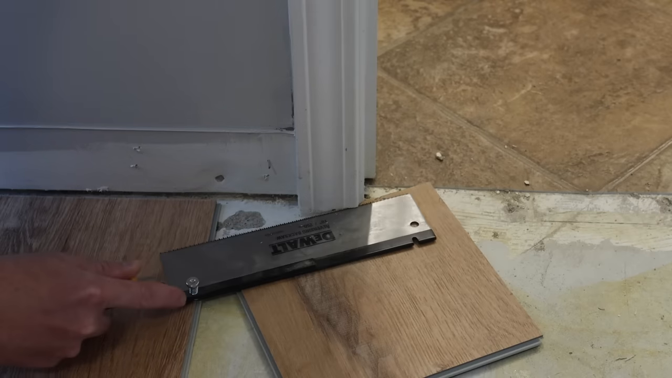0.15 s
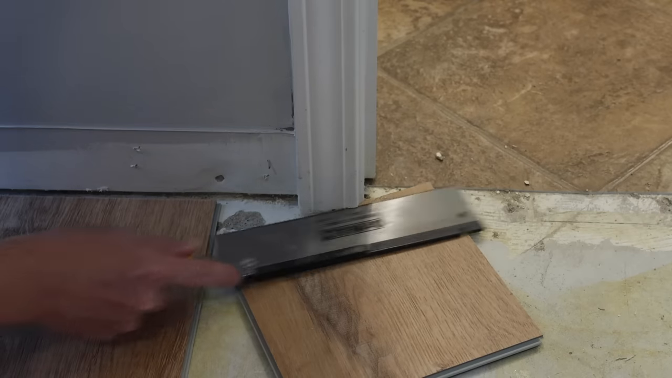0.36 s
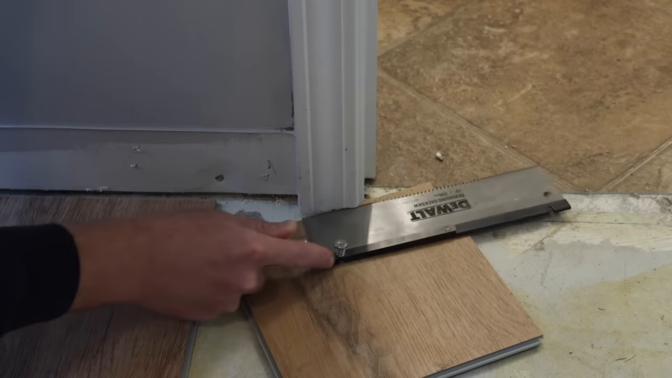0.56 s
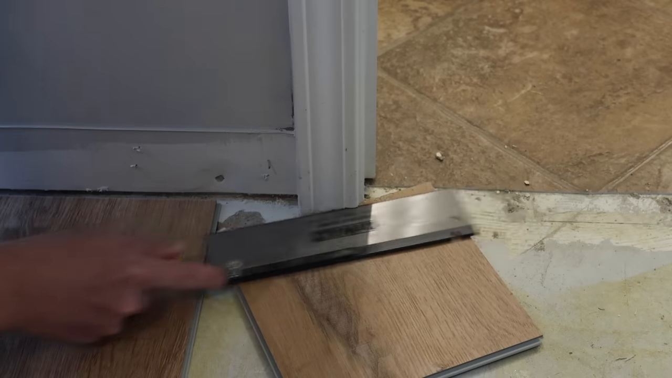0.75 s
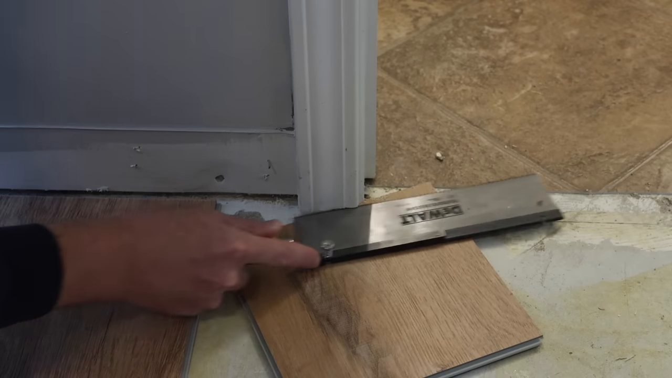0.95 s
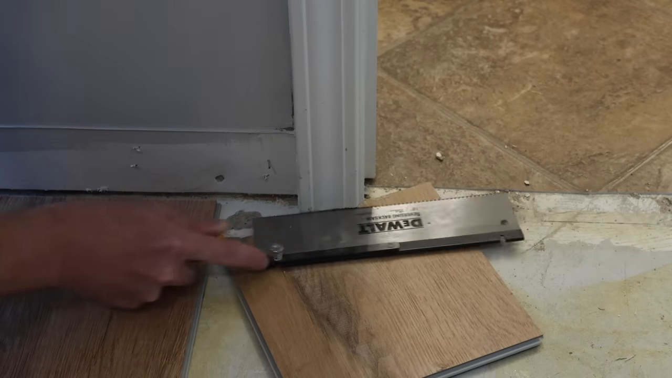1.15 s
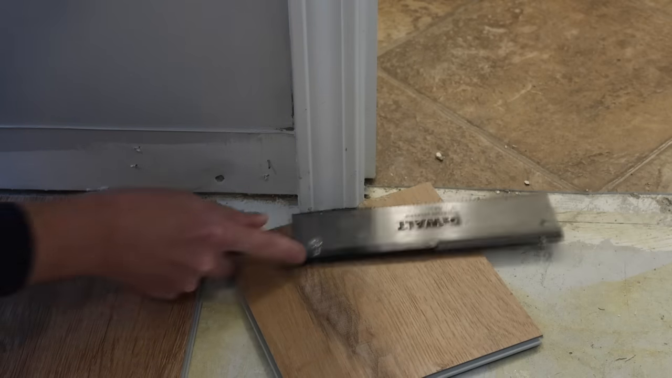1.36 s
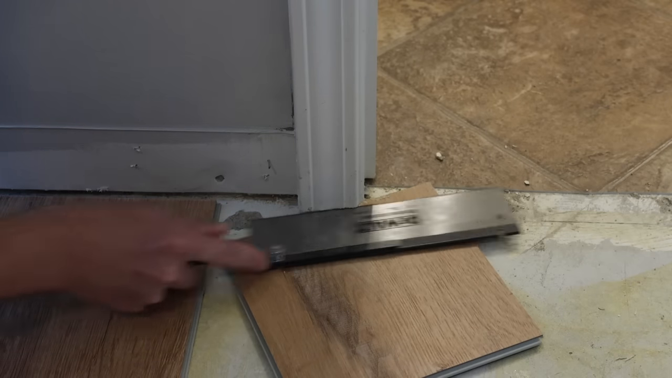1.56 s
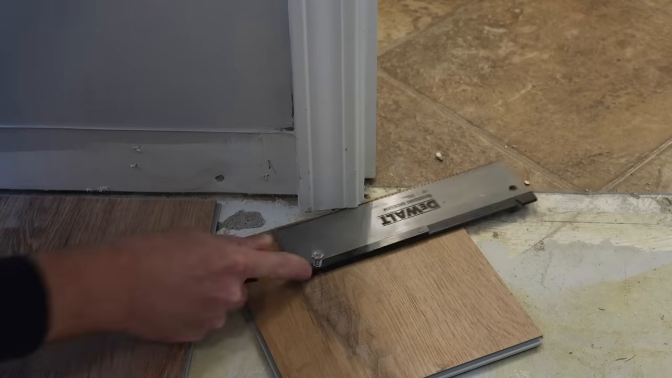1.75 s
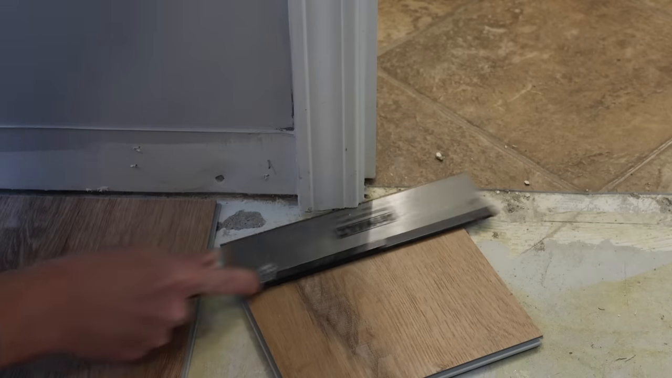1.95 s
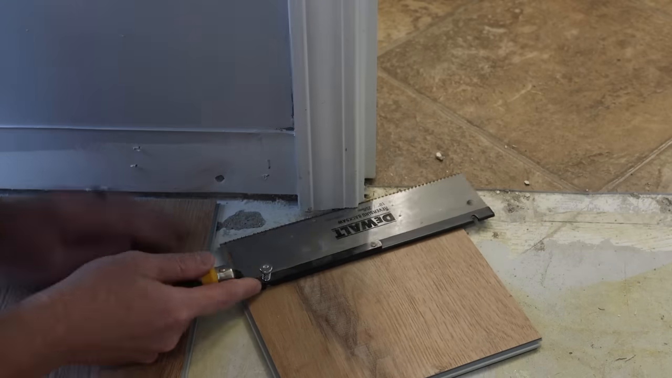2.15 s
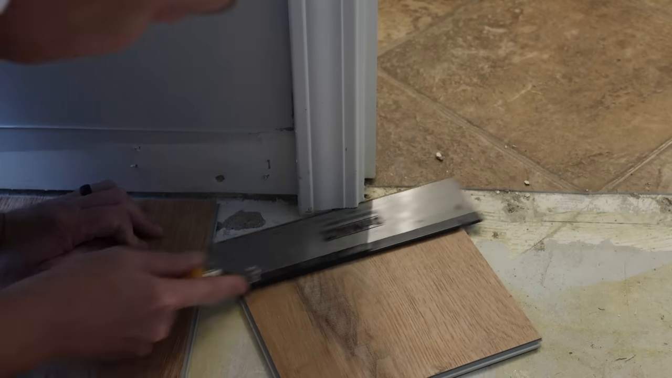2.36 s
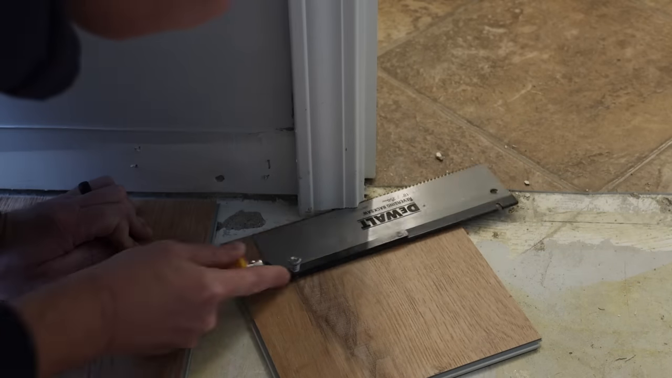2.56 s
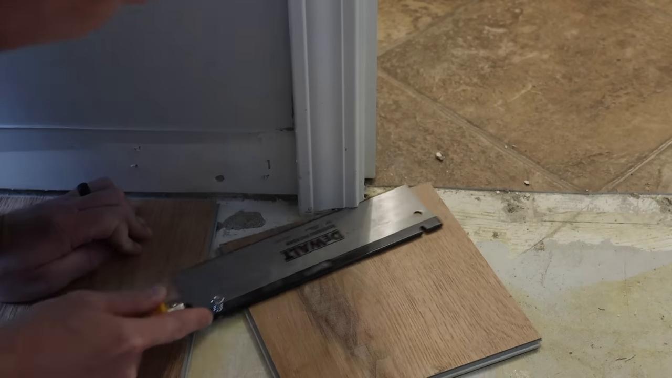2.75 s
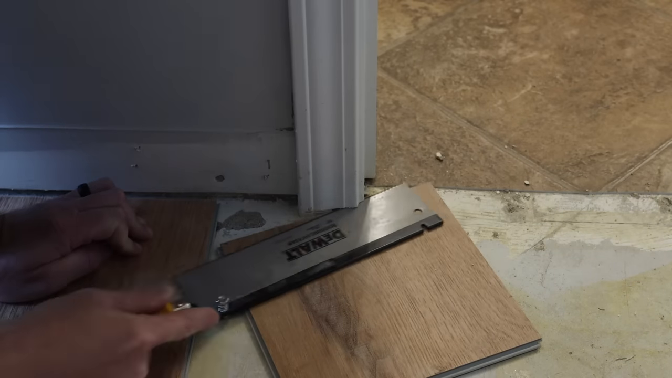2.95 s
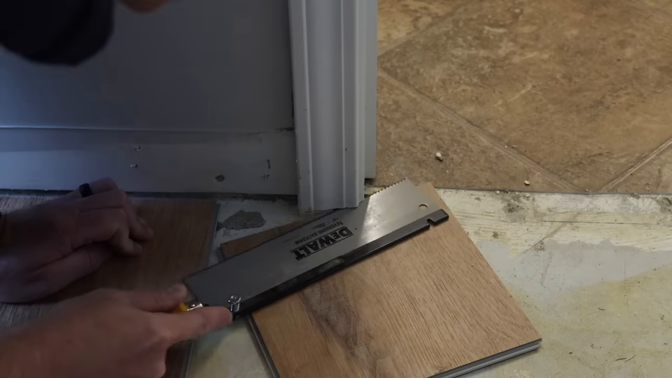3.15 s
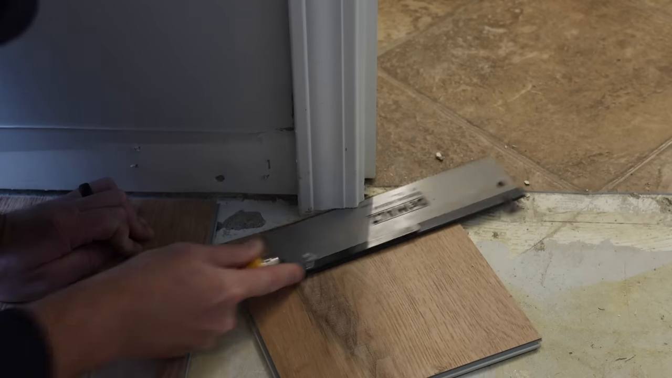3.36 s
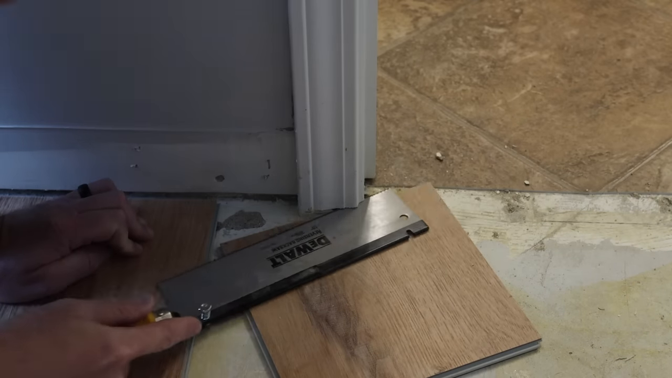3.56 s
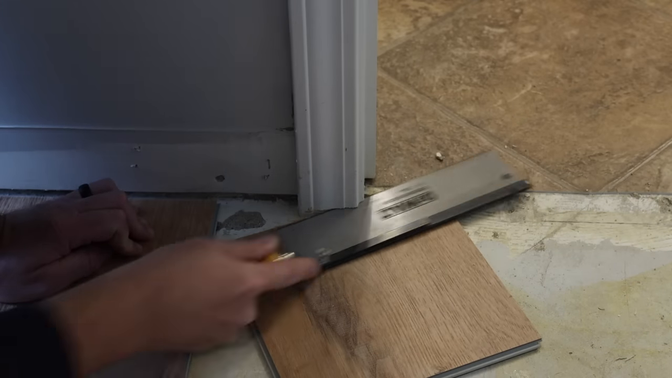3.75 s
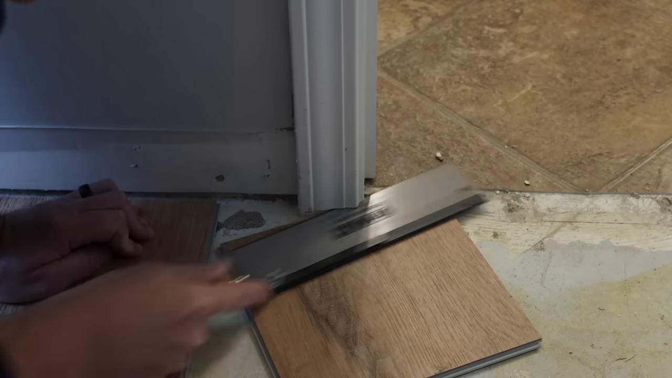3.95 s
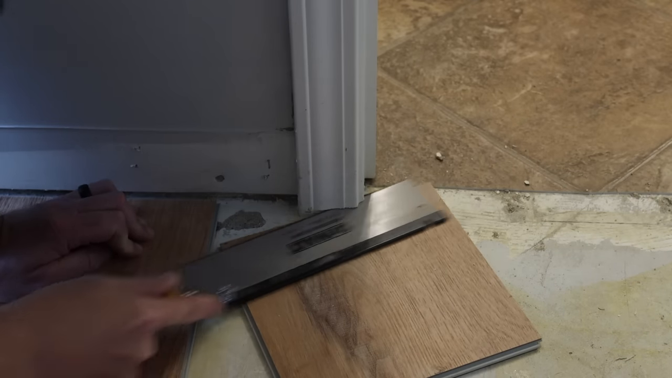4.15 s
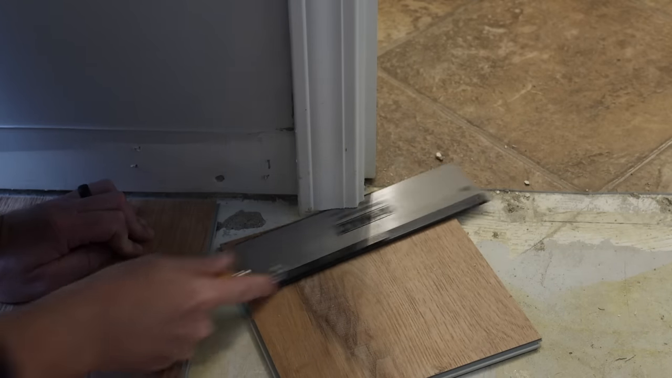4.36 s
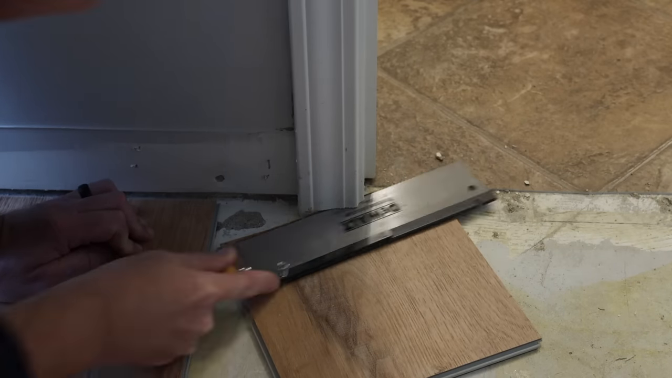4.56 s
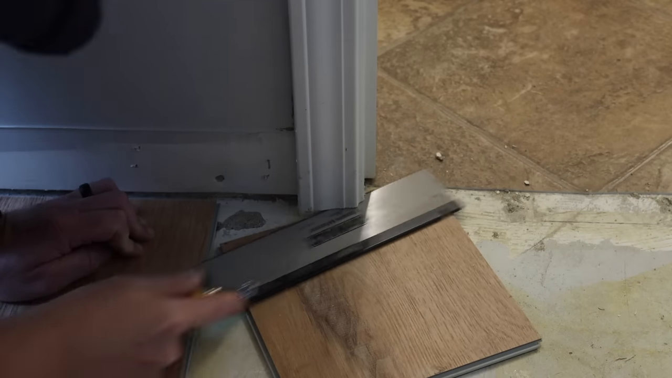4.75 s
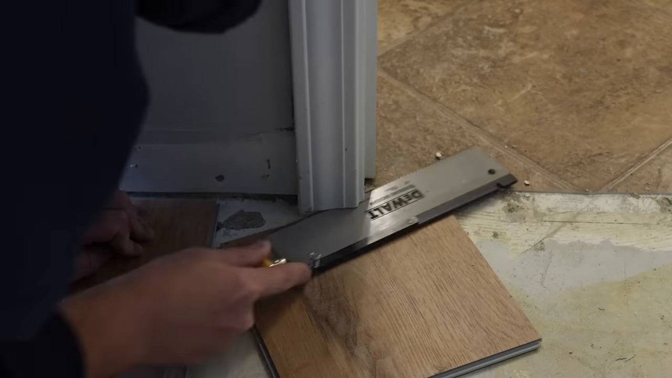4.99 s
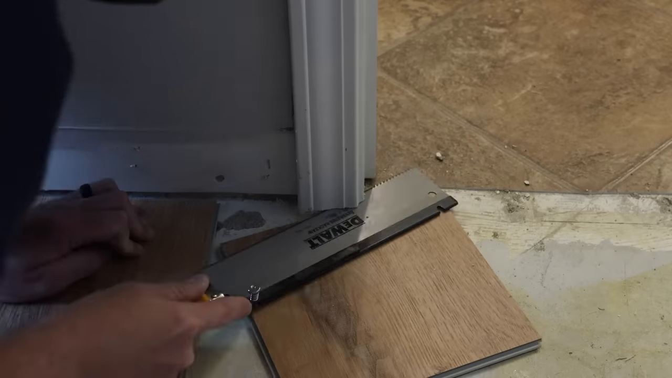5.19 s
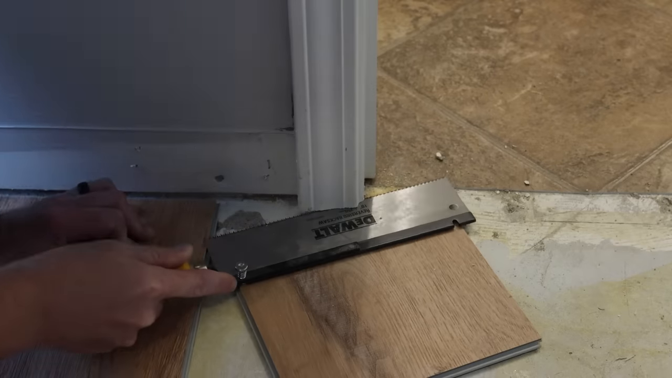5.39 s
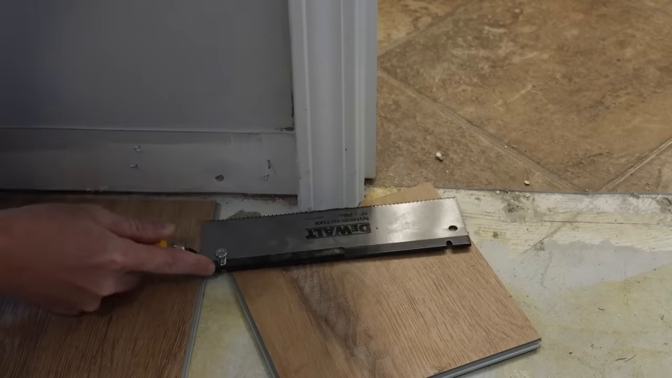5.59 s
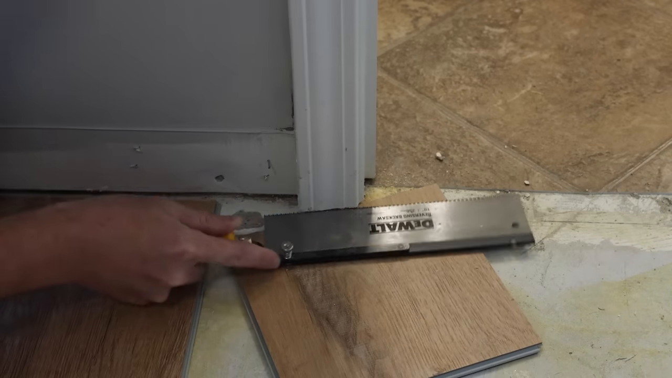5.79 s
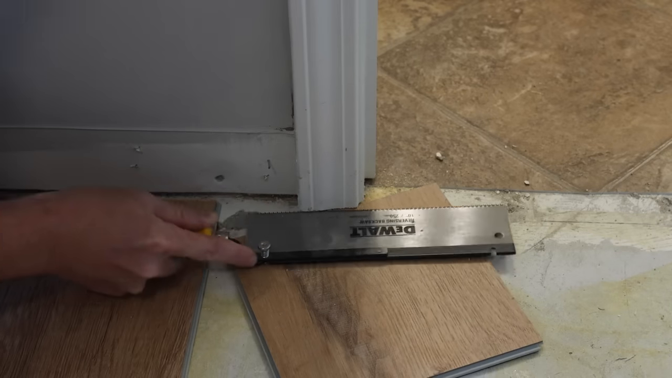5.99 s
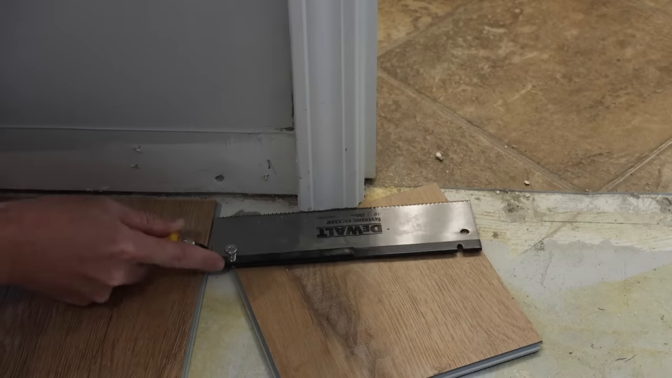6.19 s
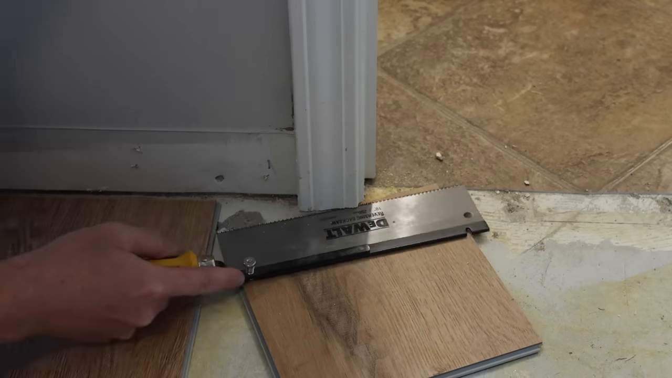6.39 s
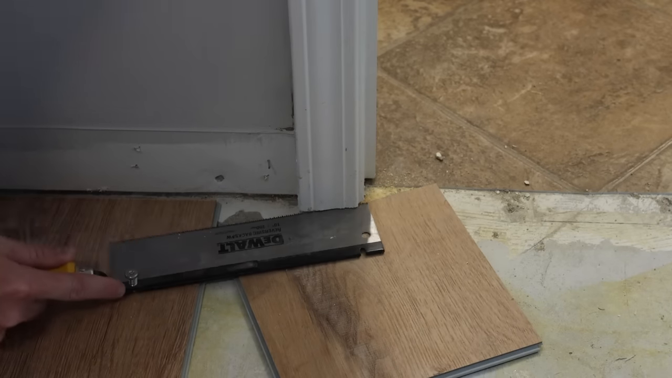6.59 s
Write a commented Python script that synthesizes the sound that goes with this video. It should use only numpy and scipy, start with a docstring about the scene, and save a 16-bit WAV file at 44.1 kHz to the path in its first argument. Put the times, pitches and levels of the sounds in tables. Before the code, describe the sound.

Close in a small bare room, a fine-toothed hand saw scrapes wood in three slow, rough strokes with sharp ticks and hard knocks. The sound cuts off abruptly and quickly resumes as rapid short rasps, first light, then in fuller groups with small pauses. A long steady run of hurried sawing follows, woody and buzzing, then stops, leaving faint scrapes and soft nudges over very low hiss.

```python
"""A flush-cut hand saw on a floor board undercuts painted door trim in a bare room.
First come three slow strokes with ticking teeth and knocks on the wood; then all sound cuts out at once.
It fades back in as rapid short stroke sounds in groups, with pauses, soft thumps and a few last nudges.
Teeth rasp (bright random grit in bands), catch (short low chatter tones) and shake board and trim
(grit through resonances); the blade rings, a short room tail follows and a faint hiss lies below."""
import sys
import numpy as np
from scipy import signal
from scipy.io import wavfile
from scipy.ndimage import uniform_filter1d

SR = 44100
rng = np.random.default_rng(int(sys.argv[2]) if len(sys.argv) > 2 else 0)


def dump(signal):
    """Clip the signal to [-1, 1] and save it as 16-bit WAV at the path in sys.argv[1]."""
    limited = np.clip(np.atleast_2d(signal).T, -1, 1)
    pcm = np.round(limited * 32767).astype(np.int16)
    wavfile.write(sys.argv[1], SR, pcm)


N = 292383

# Rasp and hiss levels in these tables are drive levels: GRIT_DB and HISS_LIFT_DB are added later.
# The slow strokes, joined by straight lines:
# time_s, trim_db, board_db, rasp_db, hiss_above_rasp_db
SLOW_STROKES = [(0.0, -27, -40, -28, -12), (0.022, -32.5, -35, -36, -2), (0.13, -23.5, -43, -29.5, -2),
                (0.182, -32.5, -34.5, -36, -8), (0.31, -41, -50, -46, -8.5),
                (0.382, -39, -40.5, -45.5, 4.5), (0.442, -32, -35.5, -36, 6.5),
                (0.478, -35.5, -35, -42, 10), (0.532, -29.5, -33.5, -35, -2.5),
                (0.59, -36, -42, -42.5, 0.5), (0.646, -48, -38.5, -43, -14.5),
                (0.676, -44.5, -43.5, -45, -3.5), (0.79, -28, -38.5, -38.5, 1.5),
                (0.824, -20.5, -40, -26.5, -1), (0.904, -33.5, -36, -33, -9), (0.957, -28, -38, -39, -6.5)]
# Each rapid stroke sound: peak_s, length_ms (shares of it give rise and fall), rasp_db,
# hiss_above_rasp_db
RAPID_STROKES = [(1.005, 16, -42.5, 3.5), (1.061, 10, -33, -8.5), (1.124, 9.3, -41.5, 4.5),
                 (1.186, 7.4, -31.5, -7), (1.286, 4.6, -40, -15), (1.321, 13, -42, -6),
                 (1.392, 14.5, -44.5, 8), (1.444, 19, -32.5, -12.5), (1.508, 10, -43, 5.5),
                 (1.556, 13, -32.5, -10), (1.627, 10, -42.5, 3), (1.689, 8, -35, -1.5),
                 (1.755, 8.8, -55, -2), (1.807, 8.8, -38, -2), (1.85, 13.4, -35, -5.5),
                 (1.895, 11, -38.5, -0.5), (1.944, 13, -35.5, -7), (1.984, 11, -37.5, -2.5),
                 (2.027, 9.3, -35.5, -3), (2.067, 9.4, -44, 1), (2.224, 9.6, -45, 0), (2.325, 9, -34.5, -2),
                 (2.364, 9.3, -42.5, 2), (2.414, 9.5, -37.5, -1), (2.454, 12, -40.5, -1),
                 (2.509, 12, -34, -0.5), (2.551, 10, -40, 0.5), (2.604, 13.3, -31.5, -3.5),
                 (2.642, 11, -31.5, -3), (2.819, 8, -49.5, -7), (2.873, 12.1, -28.5, -3),
                 (2.915, 8.4, -32.5, -3), (2.956, 11.5, -30, -2.5), (3.0, 10, -32, -1.5),
                 (3.039, 9.6, -32, -1), (3.077, 8.7, -32, -4), (3.123, 9.5, -32.5, -2), (3.161, 9, -35, -3),
                 (3.313, 11.4, -36.5, -1.5), (3.355, 10.3, -37, 0), (3.399, 10.5, -30, -1.5),
                 (3.439, 9.7, -29, -7), (3.532, 11, -54, 0), (3.659, 12, -30.5, -3), (3.693, 8, -34, -2),
                 (3.734, 10.6, -30, -5), (3.768, 10, -30, -7), (3.814, 10.8, -28, -3),
                 (3.852, 10.5, -31.5, -4.5), (3.89, 9.8, -29, -4), (3.933, 9.7, -28, -4),
                 (3.981, 10.5, -30, -3), (4.02, 10, -31.5, -6), (4.066, 9.6, -29, -4.5),
                 (4.1, 11, -31.5, -5), (4.149, 7.8, -34, 0), (4.186, 7.9, -34.5, -5.5),
                 (4.229, 8.6, -34.5, -0.5), (4.271, 8.8, -36.5, -2.5), (4.323, 11, -34, -4),
                 (4.376, 7.3, -36, -6), (4.418, 8.4, -31.5, -5.5), (4.455, 9.3, -33.5, -6.5),
                 (4.512, 11, -36, -2), (4.569, 10, -37, -6.5), (4.61, 8.1, -33.5, -1.5),
                 (4.648, 8.6, -33.5, -6), (4.699, 7.7, -32, -4.5), (4.738, 8.9, -33.5, -7.5),
                 (4.784, 9.5, -30.5, -5.5), (4.82, 10.6, -31, -9), (4.866, 11.3, -33, -3),
                 (4.902, 11, -36, -6), (4.946, 10.6, -31.5, -5), (4.984, 7.2, -30.5, -8.5),
                 (5.03, 10, -32, -1.5), (5.07, 9.7, -33, -7.5), (5.113, 9.1, -29.5, -5),
                 (5.149, 11, -32, -8), (5.197, 10.3, -29.5, -3.5), (5.229, 10.5, -29, -7),
                 (5.279, 11, -31.5, -4), (5.32, 10.5, -31.5, -7), (5.368, 10.7, -36.5, -2.5),
                 (5.5, 10, -68.5, -3), (5.58, 9.2, -69, 3), (5.69, 17, -66, -2), (5.755, 16, -54.5, -2),
                 (5.79, 13, -58.5, -6), (5.898, 9.5, -54.5, -1), (5.945, 11, -43, -10), (5.99, 8.4, -48, 0),
                 (6.023, 13, -44.5, 2), (6.128, 6.6, -56.5, 4), (6.151, 8.8, -43.5, -5),
                 (6.218, 10, -60, -10), (6.44, 11, -70.5, 0.5), (6.558, 15, -59.5, -0.5),
                 (6.62, 10, -54, -3)]
# Steady drag under the rapid strokes, in stretches, from firm cutting to faint contact in pauses:
# start_s, end_s, board_db, trim_above_board_db, blade_ring_db, rasp_between_strokes_db,
# hiss_above_rasp_db, growth_over_stretch_db
DRAGS = [(0.981, 1.028, -45.5, -1, -60, -56, -9, 11), (1.057, 1.215, -45.5, 0, -44, -48, -8.5, 8),
         (1.286, 1.339, -50, 7.5, -43, -56, -12, -3), (1.363, 1.59, -45, 3.5, -43.5, -45, -13, 3.5),
         (1.616, 1.699, -49.5, 7.5, -42, -45.5, -8, 14), (1.749, 2.065, -39, -2.5, -46, -48.5, -10, 12),
         (2.077, 2.137, -36, -6, -52, -54, -0.5, -14), (2.212, 2.285, -58, 5, -49, -48.5, -3, -1),
         (2.307, 2.381, -38, 1.5, -60, -45.5, -7, -8), (2.401, 2.472, -34.5, -0.5, -64, -47, -8, -5),
         (2.497, 2.669, -32, -4, -46.5, -46, -15, 0), (2.717, 2.84, -60, 0.5, -65, -68, -12, 7),
         (2.85, 3.175, -30.5, -1.5, -59, -43.5, -13, 4.5), (3.241, 3.285, -62, 7, -59, -56.5, -7, -2),
         (3.291, 3.468, -31.5, -3, -57, -47, -17, -1.5), (3.51, 3.565, -50, 4.5, -70, -64, -10, 9),
         (3.605, 3.63, -48, -8, -61, -54, -5, 1), (3.632, 4.281, -32, 1, -50, -42.5, -9.5, 0.5),
         (4.315, 4.493, -30, -2.5, -53, -42, -10.5, -5), (4.509, 4.755, -32, 0, -50, -43.5, -9, -2),
         (4.768, 5.287, -31, 0.5, -46.5, -46.5, -9, -1.5), (5.306, 5.391, -38, -1.5, -48.5, -51, -5, -6.5),
         (5.407, 5.44, -46.5, -3, -58, -54.5, -3, -1), (5.49, 5.605, -67.5, -2, -75, -74, 2, 0.5),
         (5.634, 5.724, -70.5, 0, -76, -82.5, 1, 3.5), (5.724, 5.795, -50, -2.5, -66, -57.5, -5.5, 3.5),
         (5.84, 5.88, -70, -1, -74, -70.5, -5, -3), (5.88, 5.98, -56.5, 0.5, -61, -65, -10, 5),
         (5.985, 6.063, -38.5, -9, -56, -50, -12, -3), (6.13, 6.173, -38, -5, -56, -51, -21, 1),
         (6.2, 6.25, -65, 1, -70, -74, -7, -5), (6.276, 6.453, -73, 4, -79.5, -73.5, -11, 4),
         (6.468, 6.51, -73, -1, -87.5, -81, -4, 0), (6.51, 6.7, -56.5, -1.5, -71.5, -64.5, 5, 14)]
# Colour of the sawing over time, blade ring and treble rise and fall:
# time_s, ring_per_stroke_against_rasp_db, treble_db
COLOUR_OVER_TIME = [(0, -8, -0.5), (.9, -8, -0.5), (1.0, -5.5, -4), (2.05, -3, -1), (2.3, -13, -0.5),
                    (3.2, -11, 0), (4.4, -12, 0), (5.4, -8, 0), (6.6, -8, -1)]
# Teeth catching and chattering: peak_s, length_ms (shares of it give rise and fall),
# board_pitch_hz, board_level_db, trim_pitch_hz, trim_level_db (pitches and levels wander a little)
BITES = [(0.019, 35, 328, -38, 566, -33), (0.055, 14.3, 215, -36, 458, -48),
         (0.114, 14.6, 318, -38, 478, -24), (0.225, 20, 239, -48, 441, -40),
         (0.296, 7.7, 248, -51, 417, -45), (0.377, 6.8, 292, -32.5, 456, -40),
         (0.425, 16, 250, -31, 454, -27.5), (0.486, 22, 321, -30, 480, -35),
         (0.579, 13.4, 235, -30, 414, -33), (0.653, 17, 238.6, -34.5, 445, -38),
         (0.708, 13, 274, -43.5, 486, -57), (0.833, 14, 179, -52, 471, -37.5),
         (0.875, 15.4, 302, -35, 604, -36), (0.946, 16, 318.4, -35, 507, -48),
         (1.014, 11.6, 272, -42, 498, -45), (1.076, 12, 283, -58, 571, -39), (1.14, 14, 279, -53, 468, -48),
         (1.188, 14, 216, -37, 457, -46), (1.31, 11, 292, -45, 466, -41), (1.397, 22, 227.4, -42, 465, -48),
         (1.439, 15.4, 232, -39, 450.5, -37), (1.49, 15, 235, -41, 457, -52),
         (1.562, 13.3, 240, -33, 557, -38), (1.641, 5.4, 232, -35, 466, -49),
         (1.703, 15.5, 256, -35, 437, -49), (1.775, 14, 255, -43, 465, -58),
         (1.809, 11.6, 273, -43, 479, -34), (1.858, 15, 258, -48, 750, -52), (1.908, 6, 318, -40, 442, -33),
         (1.943, 8, 310, -39, 450, -31), (1.996, 10, 282, -34, 460, -37), (2.032, 15, 285, -43, 459, -39),
         (2.074, 14, 218.6, -29, 445, -30), (2.225, 18, 205, -65, 760, -53),
         (2.273, 9, 226, -41, 535, -45.5), (2.343, 14.2, 248.3, -24, 409, -42),
         (2.439, 13.3, 245, -27.5, 530, -49), (2.504, 14, 233, -33, 428.5, -28),
         (2.549, 9.1, 181, -29.5, 462, -40.5), (2.605, 14.7, 272, -26, 421, -32),
         (2.644, 6, 206, -35, 549, -30), (2.749, 18, 241, -65, 554, -67),
         (2.874, 14, 223.8, -22, 439.4, -34), (2.914, 11, 220, -44, 504, -50),
         (2.962, 11, 182.2, -19.5, 472, -31), (3.008, 13, 207, -47, 413.6, -33.5),
         (3.046, 13.7, 195.5, -16.5, 422.4, -21), (3.128, 10, 135, -29, 394, -26),
         (3.165, 11, 213, -44, 400, -39), (3.265, 9, 205, -42, 538, -47), (3.308, 14, 203, -29.5, 441, -30),
         (3.341, 8, 222, -34, 466, -45), (3.393, 14, 204.3, -29, 474, -30), (3.447, 5, 245, -27, 439, -25),
         (3.526, 8.1, 226, -47, 517, -43), (3.565, 11.6, 226, -30, 333, -40.5),
         (3.651, 13, 221.6, -30, 428.5, -30.5), (3.695, 11.4, 203, -42, 545.5, -34),
         (3.725, 13, 225, -35, 409, -35), (3.817, 12, 229.5, -25, 419.3, -25),
         (3.887, 12, 217.3, -24.5, 422, -32), (3.932, 9.8, 288, -37, 483, -21.5),
         (3.978, 10.4, 223, -34, 423, -34), (4.024, 13.5, 234, -36, 427, -40),
         (4.073, 14, 216, -18.5, 413, -33), (4.12, 16, 218, -49, 501, -31),
         (4.163, 15, 151, -25.5, 463, -33), (4.243, 6, 204, -31, 394, -31.5),
         (4.264, 11, 195, -44, 568, -43), (4.349, 10.5, 140, -30, 430, -32),
         (4.419, 9.8, 178, -30, 426, -25), (4.462, 13.4, 230, -48, 627, -34.5),
         (4.517, 13.7, 232, -22, 448, -27), (4.611, 12, 173, -36, 470, -43), (4.649, 7, 229, -36, 563, -28),
         (4.697, 12, 184, -41, 418, -25), (4.727, 14, 162, -34, 518, -32),
         (4.782, 11.9, 285, -33, 437.6, -23), (4.822, 8.1, 231, -29, 521, -35),
         (4.87, 13.3, 261.7, -26, 365, -29), (4.948, 13.2, 229, -32, 422.5, -20.5),
         (4.985, 14, 255, -41, 510, -44), (5.031, 14, 220, -22.5, 481.6, -28.5),
         (5.069, 16.7, 220, -47, 369.6, -34), (5.118, 7.3, 272, -30, 404.5, -25),
         (5.153, 12, 325, -39, 573, -30.5), (5.211, 13.5, 286, -28, 419.3, -27.5),
         (5.285, 10.4, 133, -28.5, 333, -37), (5.326, 6, 189, -42, 510, -32),
         (5.378, 14, 249, -50, 523, -50), (5.77, 14, 196, -43.5, 360, -57),
         (5.918, 12.5, 229, -49, 336, -54), (5.994, 6, 214, -37, 552, -48),
         (6.032, 15, 204.4, -40, 414, -43), (6.063, 10, 215, -43, 340, -45),
         (6.154, 13, 237, -44.5, 480, -38), (6.221, 9.6, 237, -54, 330, -63),
         (6.25, 10, 251, -59, 370, -65), (6.39, 9, 230, -71, 446, -63), (6.559, 12, 202, -58.5, 408, -63)]
# Ticks of the blade, teeth snagging in the cut and light touches in pauses:
# start_s, level_db, ring_pitch_hz
BLADE_TICKS = [(0.052, -25, 1610), (0.114, -24, 1210), (0.1384, -17.5, 2010), (0.387, -26, 2760),
               (0.4442, -22, 5290), (0.5207, -22.5, 1730), (0.6394, -28, 1730), (0.7417, -23, 1720),
               (0.8103, -17.5, 4550), (0.8154, -16, 1770), (0.8262, -17, 6260), (0.8384, -18, 1180),
               (0.862, -18, 1850), (1.0585, -36, 2030), (1.1662, -22.5, 1170), (1.283, -26.5, 1450),
               (1.427, -17.5, 1140), (1.4417, -12.5, 1070), (1.55, -22, 1980), (1.576, -22, 1310),
               (1.9435, -27, 1190), (2.018, -24.5, 2430), (2.2114, -47, 1700), (2.7585, -33, 2230),
               (3.267, -35, 2180), (3.56, -45, 2000), (3.6918, -25, 1860), (3.9315, -23, 1540),
               (4.0162, -19, 1870), (4.6399, -31, 1720), (4.77, -31.5, 2500), (5.588, -56, 1310),
               (6.2816, -53, 1420), (6.307, -48.5, 2080), (6.309, -49, 950), (6.387, -56, 1980)]
# The blade knocks the wood: start_s, peak_db, trim_drive_against_board_db
KNOCKS = [(.744, -16, 19.5), (.767, -15, 19), (0.7879, -24, 22.5), (1.2833, -42, 43)]
# Low soft thumps of the board among the rapid strokes: start_s, peak_db, length_ms
THUMPS = [(2.864, -18, 9.5), (2.96, -28, 18), (3.295, -28, 12)]
# Colour of the rasp over pitch: pitch_hz, level_db (relative, per hertz)
RASP_COLOUR = [(530, -30), (900, 0), (1210, -19.5), (1580, 1.5), (1910, 2.5), (3310, -1.5), (4150, -1.5),
               (4910, -7.5), (6770, -6), (9350, -17.5), (12900, -16.5), (15100, -25), (15600, -39.5)]
# Steel lines heard inside the rasp: pitch_hz, width_hz, level_db (relative)
STEEL_LINES = [(1970, 40, -24.5), (3980, 36, -16), (6420, 46, -17.5)]
# Resonances of the floor board: pitch_hz, width_hz, level_db (relative)
BOARD_MODES = [(130, 61.6, -2.5), (220.5, 77.6, 5), (266, 161, -8.5)]
# Resonances of the door trim: pitch_hz, width_hz, level_db (relative)
TRIM_MODES = [(431.4, 119, -5.5), (566.7, 76.2, 0.5), (597, 109, -1.5), (696, 344, -20)]
# Resonances of the saw blade: pitch_hz, width_hz, level_db (relative)
BLADE_MODES = [(719, 196, 0), (936, 99, 4), (963, 146, 4.5), (1204, 120, -1.5), (1333, 51, 0),
               (1732, 36, -0.5)]

CUT_S, RETURN_S = 0.959, 0.025   # the sound cuts out abruptly; then it fades back in over this time
STROKE_RISE, STROKE_FALL = 0.94, 0.88   # shares of the stroke length
BITE_RISE, BITE_FALL = 0.9, 1.05   # shares of the bite length
SET_IN_DB_PER_S, DIE_DB_PER_S = 3000, 449.5   # how fast a stretch of drag sets in and dies
SLOW_BLADE_DB = 0   # blade ring against rasp in the slow strokes
GRIT_DB, HISS_LIFT_DB = 5.5, 7   # added to all rasp bands; added to the hiss
TOP_HZ = 9500   # bands centred above this are dulled by treble_db
TICK_T60_S, SCRATCH_T60_S = 0.016, 0.014   # time to fade by 60 dB
SCRATCH_DB, SCRATCH_GROWTH = -7, 0.44   # scratch for a 0 dB tick; louder ticks are brighter
ROOM_T60_S, ROOM_DB = 0.25, -16.5
FLOOR_DB = -80
CUTOFF_HZ = 15760


def amp(db):
    """Turn decibels into a plain gain."""
    return 10 ** (np.asarray(db) / 20)


def rms_one(x):
    """Scale a sound to an average strength (RMS) of one."""
    return x / np.sqrt(np.mean(x ** 2) + 1e-20)


def drift(rate_hz):
    """Slow random wandering of spread 1: noise smoothed at a low sample rate, then stretched."""
    step = 40   # samples per slow point
    r = np.exp(-2 * np.pi * rate_hz * step / SR)
    noise = rng.standard_normal(N // step + 2002)
    slow = signal.lfilter([1], [1, -2 * r, r * r], noise)[2000:]
    return np.interp(np.arange(N) / step, np.arange(len(slow)), rms_one(slow))


def grit(per_s, spread_db):
    """Random tooth contacts: single clicks of uneven size and either sign."""
    sizes = amp(spread_db * np.minimum(rng.exponential(1, N), 4))
    signs = rng.choice([-1, 1], N)
    return sizes * signs * (rng.random(N) < per_s / SR) + 1e-18


def body(x, modes):
    """A solid body: side-by-side resonances with alternating signs; a wider one dies faster."""
    out = 0
    for k, (hz, width_hz, db) in enumerate(modes):
        r = np.exp(-np.pi * width_hz / SR)
        feed = amp(db) * (1 - r * r) / 2 * np.array([1, 0, -1])
        back = [1, -2 * r * np.cos(2 * np.pi * hz / SR), r * r]
        out = out + (-1) ** k * signal.lfilter(feed, back, x)
    return out


def swell(peak_s, rise_ms, fall_ms, flat=3.3):
    """Sample span and bell shape of one push; a larger flat gives a squarer bell."""
    first = max(round((peak_s - 0.004 * rise_ms) * SR), 0)   # four rise lengths ahead
    last = min(round((peak_s + 0.004 * fall_ms) * SR), N)
    at = np.arange(first, last)
    ms = 1000 * (at / SR - peak_s)
    width_ms = np.where(ms < 0, rise_ms, fall_ms)
    return at, np.exp(-0.5 * np.abs(ms / width_ms) ** flat)


def cutting(rasp_gain, hiss_gain, patchy_db=0.5):
    """Dense tooth grit in third-octave bands whose colour flickers; rasp blends into hiss with pitch."""
    bite = amp(1.58 * drift(110))   # all bands jump together as single teeth bite
    teeth = [rms_one(bite * grit(9000, 2.9)) for _ in range(2)]
    treble = colour_gain(column=2)
    colour_hz, colour_db = np.array(RASP_COLOUR).T
    edges = 1100 * 2 ** np.arange(0, 4.1, 1 / 3)
    out = 0
    for k, (low, high) in enumerate(zip(edges, edges[1:])):
        band_filter = signal.butter(2, [low, high], "band", fs=SR, output="sos")
        band = signal.sosfilt(band_filter, teeth[k % 2])
        hz = np.sqrt(low * high)
        db = np.interp(np.log(hz), np.log(colour_hz), colour_db)
        # all rasp up to 2600 Hz, all hiss from 7000 Hz
        hissy = np.clip(np.log(hz / 2600) / np.log(7000 / 2600), 0, 1)
        gain = rasp_gain ** (1 - hissy) * (amp(HISS_LIFT_DB) * hiss_gain) ** hissy
        if hz > TOP_HZ:
            gain = gain * treble
        flicker_db = patchy_db * drift(47) + 1.42 * drift(13)
        out = out + amp(db + GRIT_DB + flicker_db) * gain * band
    return out + body(out, STEEL_LINES)


def stroke_power():
    """Power of rasp and hiss: each rapid stroke swells and fades, and overlapping strokes add up."""
    rasp, hiss = np.zeros((2, N))
    for peak_s, length_ms, rasp_db, above_db in RAPID_STROKES:
        at, bell = swell(peak_s, STROKE_RISE * length_ms, STROKE_FALL * length_ms, flat=1.76)
        rasp[at] += (amp(rasp_db) * bell) ** 2
        hiss[at] += (amp(rasp_db + above_db) * bell) ** 2
    return rasp, hiss


def pressure():
    """Gains of board, trim, blade ring, rasp and hiss: the slow strokes, then each stretch of drag."""
    t = np.arange(N) / SR
    times, *columns = np.transpose(SLOW_STROKES)
    trim, board, rasp, above = [np.interp(t, times, column) for column in columns]
    slow_db = [board, trim, rasp + SLOW_BLADE_DB, rasp, rasp + above]
    power = amp(slow_db) ** 2 * (t < CUT_S) + 1e-12
    for start, end, board_db, trim_db, ring_db, rasp_db, above_db, growth_db in DRAGS:
        at = np.arange(round((start - 0.05) * SR), min(round((end + 0.2) * SR), N))
        progress = np.clip((t[at] - start) / (end - start), 0, 1)
        shape_db = growth_db * (progress - 0.5)
        shape_db -= SET_IN_DB_PER_S * np.maximum(start - t[at], 0)
        shape_db -= DIE_DB_PER_S * np.maximum(t[at] - end, 0)
        levels = np.array([board_db, board_db + trim_db, ring_db, rasp_db, rasp_db + above_db])
        power[:, at] += amp(levels[:, None] + shape_db) ** 2
    return np.sqrt(power)


def colour_gain(column):
    """Gain over time from one column of COLOUR_OVER_TIME: blade ring or treble rises and falls."""
    table = np.array(COLOUR_OVER_TIME)
    return amp(np.interp(np.arange(N) / SR, table[:, 0], table[:, column]))


def shaken_wood(board, trim, rasp, rasp_power):
    """Coarse catches shake board and trim into resonance, most in mid-stroke."""
    pushing = np.sqrt(1 + rasp_power / rasp ** 2) ** 0.42
    catches = pushing / uniform_filter1d(pushing, 4000) * grit(900, 2.9)
    no_treble = signal.butter(2, 750, fs=SR, output="sos")   # thick trim passes no treble
    heavy = signal.sosfilt(no_treble, body(catches, TRIM_MODES))
    return board * rms_one(body(catches, BOARD_MODES)) + trim * rms_one(heavy)


def blade_ring(gain):
    """Random tooth contacts excite the resonances of the steel blade."""
    return gain * rms_one(body(grit(1500, 3.5), BLADE_MODES))


def chatter(uneven_db=1.5):
    """In each bite the teeth judder nearly evenly and drive one tone of the board and one of the trim."""
    out = np.zeros(N)
    wobble = 0.05 * np.array([drift(50), drift(50)])
    size = amp(uneven_db * np.array([drift(79), drift(90)]))
    phases = rng.random((len(BITES), 2))
    for bite, phase in zip(BITES, phases):
        peak_s, length_ms, board_hz, board_db, trim_hz, trim_db = bite
        at, bell = swell(peak_s, BITE_RISE * length_ms, BITE_FALL * length_ms)
        pitch_hz = [[board_hz], [trim_hz]] * np.exp(wobble[:, at])
        turns = phase[:, None] + np.cumsum(pitch_hz, axis=1) / SR
        level = np.sqrt(2) * amp([[board_db], [trim_db]]) * size[:, at]
        tones = level * np.cos(2 * np.pi * turns)
        out[at] += bell * tones.sum(axis=0)
    return out


def ticks():
    """Each snag or light touch of the blade gives a short ring and a burst of bright scratch."""
    out, t = np.zeros(N), np.arange(2000) / SR
    bright = signal.butter(2, [2500, 8000], "band", fs=SR)
    attack = np.minimum(t / 0.00071, 1)
    noises = rng.standard_normal((len(BLADE_TICKS), len(t)))
    for (start_s, db, hz), noise in zip(BLADE_TICKS, noises):
        scratch = rms_one(signal.lfilter(*bright, noise)) * amp(-60 * t / SCRATCH_T60_S)
        scratch *= amp(SCRATCH_DB + SCRATCH_GROWTH * db)
        rough = rms_one(body(noise, [(hz, 0.27 * hz, 0)]))   # a dry contact blurs the pitch
        ring = (0.72 * np.sin(2 * np.pi * hz * t) + 0.5 * rough) * amp(-60 * t / TICK_T60_S)
        i = round(start_s * SR)
        out[i:i + len(t)] += amp(db) * (ring + scratch) * attack
    return out


def knocks():
    """A blunt blow rings trim and board; the pressed blade damps it after a cycle or two."""
    out, blow = np.zeros(N), np.zeros(3000)
    blow[:44] = np.hanning(44)   # about 1 ms of contact
    t = np.arange(len(blow)) / SR
    damped = 0.3 + np.exp(-(t / 0.0052) ** 2)
    for start_s, db, trim_db in KNOCKS:
        ring = damped * (amp(trim_db) * body(blow, TRIM_MODES) + body(blow, BOARD_MODES))
        i = round(start_s * SR)
        out[i:i + len(ring)] += amp(db) * ring / np.abs(ring).max()
    return out


def thumps():
    """Low soft thumps of the board: each is a one-sided push of air."""
    out = np.zeros(N)
    for start_s, db, length_ms in THUMPS:
        push = np.hanning(round(length_ms * SR / 1000))
        out[round(start_s * SR):][:len(push)] += amp(db) * push
    return out


def room(x):
    """Short diffuse room tail, as fading noise; the abrupt cut in the sound ends the tail too."""
    t = np.arange(SR // 4) / SR
    tail = rng.standard_normal(len(t)) * amp(-60 * t / ROOM_T60_S) * (t > 0.004)
    tail /= np.sqrt(np.sum(tail ** 2))
    cut = round(CUT_S * SR)
    parts = [signal.fftconvolve(part, tail)[:len(part)] for part in (x[:cut], x[cut:])]
    return np.concatenate(parts)


def quiet_floor():
    """Faint steady noise, softer towards the treble."""
    noise = rng.standard_normal(N)
    return amp(FLOOR_DB) * rms_one(signal.lfilter([1], [1, -0.9], noise))


def scene():
    """Mix saw, wood and blade, cut the sound out and fade it back in, then add room and quiet floor."""
    board, trim, ring, rasp, hiss = pressure()
    rasp_power, hiss_power = stroke_power()
    # each rapid stroke also rings the blade
    ring = np.sqrt(ring ** 2 + colour_gain(column=1) ** 2 * rasp_power)
    dry = cutting(np.sqrt(rasp ** 2 + rasp_power), np.sqrt(hiss ** 2 + hiss_power))
    dry = dry + shaken_wood(board, trim, rasp, rasp_power) + blade_ring(ring)
    dry = dry + chatter() + ticks() + knocks() + thumps()
    since = np.arange(N) / SR - CUT_S
    dry *= np.where(since < 0, 1, np.clip(since / RETURN_S, 0, 1) ** 2)
    return (dry + amp(ROOM_DB) * room(dry) + quiet_floor())[None]


def record(dry):
    """The small microphone loses the deep bass; the top is cut steeply."""
    bass_cut = signal.butter(3, 80, "high", fs=SR, output="sos")
    top_cut = signal.ellip(12, 0.5, 75, CUTOFF_HZ, fs=SR, output="sos")
    return signal.sosfilt(top_cut, signal.sosfilt(bass_cut, dry))


dry = scene()
out = record(dry)
dump(out)
```